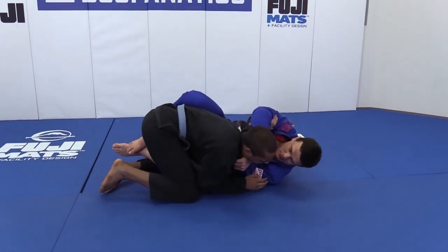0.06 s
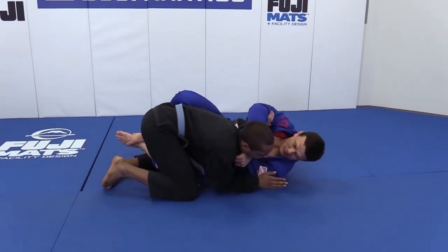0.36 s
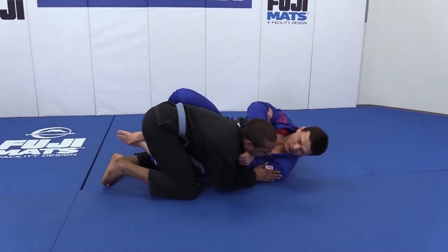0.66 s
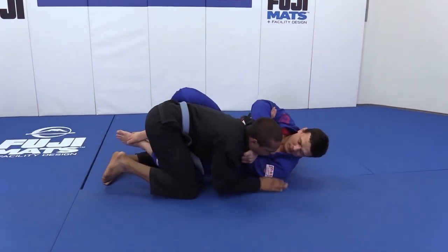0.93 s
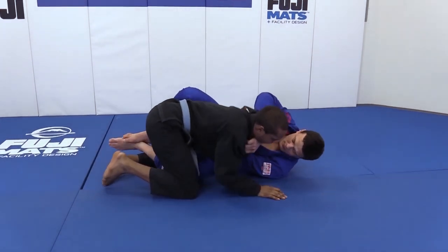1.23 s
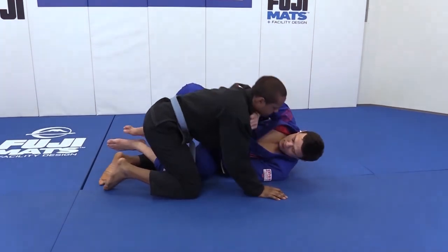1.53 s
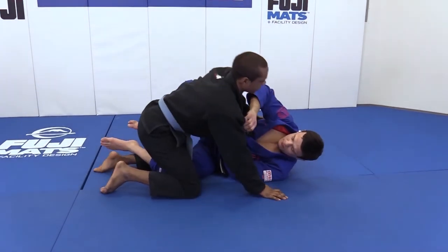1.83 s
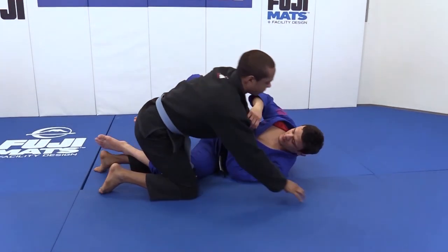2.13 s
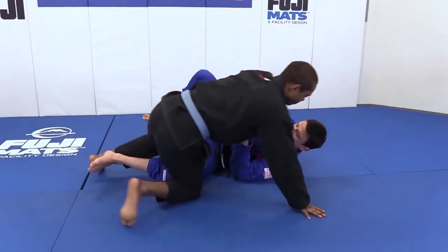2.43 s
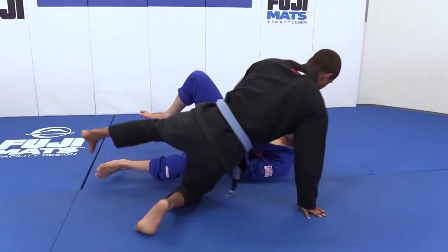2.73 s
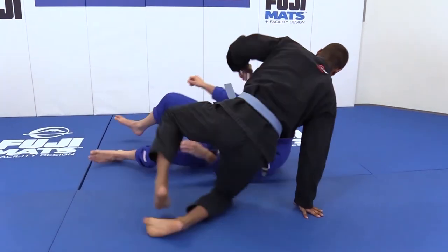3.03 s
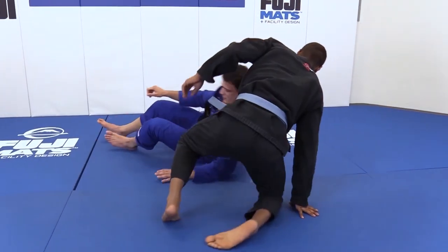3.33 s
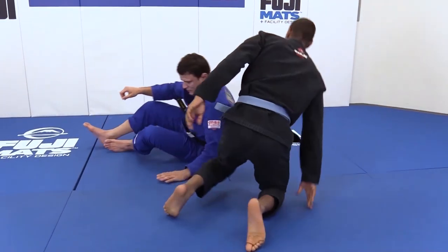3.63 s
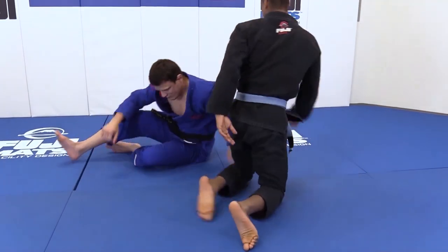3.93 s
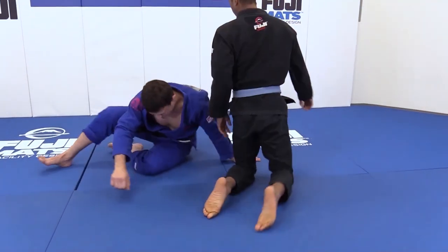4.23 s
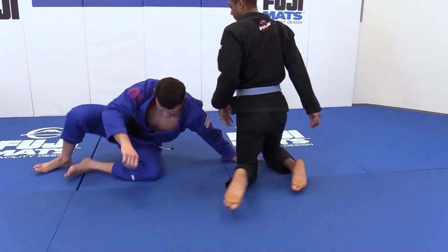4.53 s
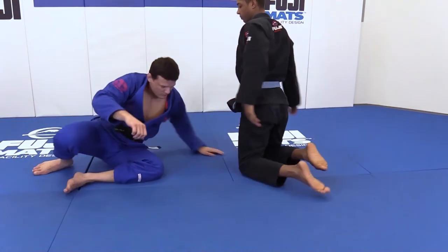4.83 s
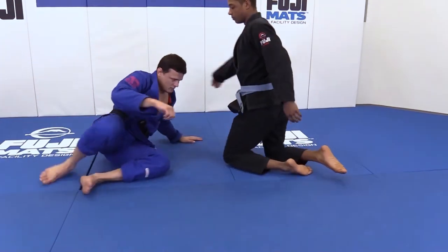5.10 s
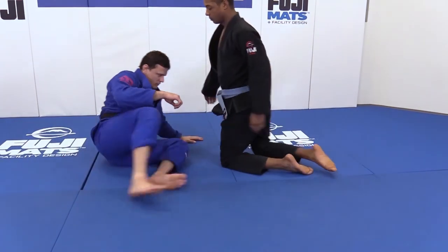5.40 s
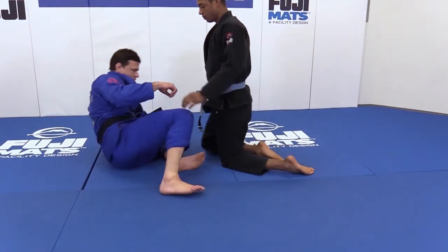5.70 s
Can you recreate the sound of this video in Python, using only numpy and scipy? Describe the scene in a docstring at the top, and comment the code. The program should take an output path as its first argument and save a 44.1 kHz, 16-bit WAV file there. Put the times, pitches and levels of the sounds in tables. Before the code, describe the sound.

Heavy cloth rustles and limbs drag, pat and thump on a padded mat as two people wrestle over faint room hiss.

```python
"""A low room hiss and a faint rustle come first; then two people in heavy cotton jackets are heard
grappling on a foam mat in a padded training room. Impact drives the slaps of hands and the thuds of
knees and hips, which set mat and floor ringing. Friction drives the swish of cloth on cloth and the
drags and scuffs over the mat's grained cover. One microphone hears it all, with a short reverberation."""
import sys
import numpy as np
from scipy import signal
from scipy.fft import rfft, irfft
from scipy.io import wavfile
from scipy.ndimage import uniform_filter1d

SR = 44100
rng = np.random.default_rng(int(sys.argv[2]) if len(sys.argv) > 2 else 0)


def wrap_up_sound(samples):
    """Save the sound to the file named by the first command line argument, as 16-bit audio."""
    columns = np.atleast_2d(samples).T
    # keep every value between -1 and 1, then stretch to whole-number steps
    tamed = np.clip(columns, -1, 1)
    steps = np.round(tamed * 32767).astype(np.int16)
    wavfile.write(sys.argv[1], SR, steps)


N = 262836
TIME = np.arange(N) / SR

# Spectra of the room's hiss, the jackets' swish and sheen, the rubbed cover and the loaded foam.
# Each row: frequency in Hz, relative level in dB.
HISS_SPECTRUM = [(15, -36), (25, -20), (60, -14.5), (100, -8.5), (160, -5), (250, -2.5), (460, -13.5),
                 (1000, -14.5), (2800, -16.5), (7000, -25), (9300, -32), (16000, -35.5)]
SWISH_SPECTRUM = [(300, -18.5), (1200, -19.5), (2200, -4), (3200, 1.5), (4500, 0.5), (7000, -5.5),
                  (8500, -13.5), (11000, -32), (16000, -45)]
SHEEN_SPECTRUM = [(3000, -31), (6500, -1), (8500, -1), (10500, -6.5), (13500, -10), (16000, -15)]
RUB_SPECTRUM = [(60, -42), (200, -30), (400, -6), (650, -1.5), (1000, 3), (1500, 1.5), (2100, 2),
                (3000, -3.5), (6000, -12), (16000, -58)]
RUMBLE_SPECTRUM = [(25, -83), (60, -19.5), (100, -14), (150, 1.5), (280, -0.5), (400, -7), (600, -8),
                   (1200, -17), (5000, -57)]
# The hiss dips briefly and later swells. Each row: time in seconds, level in dB.
HISS_LEVELS = [(0, -48.5), (.68, -47), (.82, -54), (1.05, -49.5), (1.5, -47.5), (2.3, -48), (2.7, -47.5),
               (3.0, -47), (5.96, -42)]
# Cloth on cloth. Each row: peak time, rise and fall in seconds, relative level in dB, sheen offset in dB.
CLOTH_STROKES = [ (0.0, .05, 0.15, -54.5, -9), (0.48, 0.22, 0.2, -55, -25), (0.637, .005, .012, -51, -8),
                 (1.075, 0.01, 0.045, -43.5, 0), (1.17, .002, 0.059, -51.5, -6),
                 (1.42, 0.15, .07, -51, -12), (1.745, 0.048, 0.089, -35.5, -6.5),
                 (1.82, 0.044, 0.062, -35.5, -4), (1.895, 0.072, 0.065, -35, -5.5),
                 (2.32, 0.18, 0.23, -59, 0), (2.535, .035, .09, -50.5, -1.5),
                 (2.89, 0.017, 0.046, -51, -1.5), (3.07, 0.08, 0.12, -39.5, -13),
                 (3.22, 0.086, .15, -26.5, -5), (3.5, .1, 0.1, -44, -3), (3.78, 0.13, .08, -47, -20),
                 (3.89, 0.038, 0.034, -53.5, 0.5), (4.03, 0.11, 0.093, -38.5, -14),
                 (4.085, .01, .05, -46, -3.5), (4.3, .09, .08, -36, -6.5), (4.46, 0.05, 0.062, -43.5, -2.5),
                 (4.6, 0.12, 0.13, -43.5, -9), (4.745, 0.061, 0.046, -39, -1),
                 (4.87, .06, 0.067, -45.5, -7), (5.029, 0.056, .055, -30.5, -5.5),
                 (5.226, 0.06, 0.068, -23.5, -0.5), (5.43, 0.078, 0.097, -27.5, -7),
                 (5.75, 0.21, 0.12, -38.5, -6.5), ]
# Limbs on the mat. Each row: peak time, rise and fall in seconds, relative rub and rumble levels in dB.
LIMB_DRAGS = [ (0.0, .05, 0.048, -50, -46), (1.32, 0.057, 0.15, -46, -52), (1.43, 0.036, 0.044, -48, -34.5),
              (2.08, 0.47, 0.13, -56.5, -50.5), (2.532, 0.037, .16, -49.5, -56),
              (2.95, 0.068, .08, -43, -42), (3.05, 0.042, 0.24, -30, -58), (3.19, 0.1, 0.14, -29.5, -36),
              (3.31, 0.048, 0.11, -30, -50), (3.61, 0.053, 0.12, -55, -39.5), (3.82, 0.15, .08, -47, -44.5),
              (4.03, .1, .09, -37, -38), (4.32, 0.13, 0.2, -42, -49), (4.6, 0.28, .08, -39, -44),
              (4.72, 0.069, 0.07, -35, -33.5), (4.87, .04, 0.15, -41.5, -62),
              (5.06, 0.11, 0.084, -34.5, -42.5), (5.43, 0.12, 0.45, -37, -49),
              (5.69, 0.16, 0.072, -43, -38.5), (5.86, 0.1, 0.054, -55, -36), ]
# The weave singing as it slides. Each row: start and length in seconds, first pitch, last pitch and
# bandwidth in Hz, level in dB.
WEAVE_SCUFFS = [ (0.279, 0.2, 445, 312, 170, -43.5), (1.68, 0.33, 900, 990, 604, -42),
                (1.751, 0.12, 577, 610, 200, -40.5), (1.784, 0.21, 2720, 2750, 1110, -39),
                (2.502, 0.097, 1030, 790, 350, -48), (2.991, .10, 786, 1130, 260, -34.5),
                (3.101, 0.21, 1240, 1360, 784, -30.5), (3.276, 0.067, 1060, 860, 170, -30),
                (3.353, 0.071, 845, 616, 200, -39), (3.475, 0.083, 330, 365, 160, -35.5),
                (3.622, 0.046, 1380, 1420, 120, -43.5), (3.74, 0.15, 2100, 2220, 300, -44),
                (3.747, 0.22, 3330, 3420, 450, -48), (3.927, 0.07, 920, 835, 250, -37.5),
                (3.95, 0.13, 1940, 1900, 700, -37.5), (4.196, 0.12, 345, 436, 185, -37.5),
                (4.43, 0.27, 405, 900, 350, -35.5), (4.528, .16, 990, 1380, 663, -31.5),
                (4.625, 0.13, 1120, 617, 720, -29), (4.807, 0.12, 1070, 1210, 360, -40.5),
                (5.154, 0.17, 2380, 3970, 1000, -34), (5.239, 0.034, 3660, 4080, 400, -23.5),
                (5.475, 0.32, 510, 710, 200, -41.5), ]
# Knees, hips and hands sinking into the mat. Each row: start in seconds, relative level in dB, pitch
# in Hz, decay in seconds, relative level of the air puff in dB, its centre in Hz.
LANDINGS = [ (0.389, -34.5, 303, 0.0045, -63, 700), (0.692, -18.5, 548, 0.0016, -30, 620),
            (0.701, -22, 233, 0.0028, -29.5, 690), (0.838, -21.5, 196, 0.0033, -46, 700),
            (1.093, -19.5, 170, 0.0033, -34, 860), (1.17, -22, 191, 0.0048, -41, 920),
            (2.344, -18, 127, 0.0038, -47, 900), (2.416, -15.5, 115, 0.0044, -42.5, 700),
            (2.47, -32, 92.8, 0.018, -58, 900), (2.857, -12.5, 302, 0.0019, -27.5, 865),
            (2.874, -12.5, 259, 0.003, -33.5, 452), (2.906, -31, 290.4, 0.016, -38, 700),
            (3.165, -14, 210, 0.0017, -47, 800), (3.179, -26, 287.5, 0.0087, -44, 800),
            (3.203, -23, 157, 0.0034, -49, 800), (3.449, -15.5, 229, 0.0035, -42, 497),
            (3.479, -17.5, 254, 0.0066, -37, 480), (3.503, -23, 206, 0.003, -41, 450),
            (3.618, -23.5, 324, 0.001, -31, 696), (3.712, -20.5, 176, 0.0026, -32, 790),
            (4.068, -16.5, 103, 0.003, -31, 800), (4.088, -15.5, 224, 0.0035, -47, 700),
            (4.162, -24.5, 290, 0.0051, -44, 600), (4.177, -18.5, 228, 0.0027, -37, 604),
            (4.657, -27.5, 157, 0.0034, -25.5, 670), (5.016, -32.5, 146, 0.0069, -37, 830),
            (5.699, -27, 224, 0.0039, -30.5, 693), (5.842, -29.5, 254, 0.0034, -50, 700),
            (5.878, -21.5, 239, 0.0014, -50, 700), (5.914, -19.5, 184, 0.0069, -49, 700), ]
# Bare skin striking the cover. Each row: start in seconds, relative level in dB, centre in Hz,
# width in octaves, decay in seconds.
SKIN_SLAPS = [ (0.685, -25, 1110, 0.93, 0.01), (0.692, -12, 1270, 1.1, 0.0035),
              (0.701, -37, 1600, 2.8, 0.012), (0.732, -36, 1490, 2.9, 0.018),
              (0.839, -16, 895, 0.66, 0.003), (2.343, -28.5, 1600, 2, 0.0016),
              (2.821, -32, 1030, 0.46, 0.0023), (3.619, -18.5, 3400, 2.2, 0.0015), ]
# Modes of mat and floor. Each row: frequency in Hz, bandwidth in Hz, gain in dB.
MAT_MODES = [(90.4, 18, -0.5), (143, 9.5, 4), (232, 20, -25), (275.2, 8.4, 5.5), (280, 30, -29),
             (361, 6.5, 5), (440, 49, -21), (494, 67, 3.5), (728, 77, -8.5), (856, 41, -16),
             (1080, 41, -29)]
# Early reflections from walls and ceiling. Each row: delay in seconds, gain as a ratio.
REFLECTIONS = [(.0065, 0.36), (0.0133, 0.29), (0.0221, .15), (.043, 0.04)]
# The room's reverberation. Each row: frequency in Hz, time to fall 60 dB in seconds.
REVERB_TIMES = [(100, 0.4), (260, 0.25), (700, 0.37), (1840, 0.26), (5000, 0.19), (14000, 0.086)]


def amp(db):
    """Amplitude grows tenfold for every 20 dB."""
    return 10 ** (np.asarray(db) / 20)


def unit(x):
    """Normalisation to an rms of 1."""
    return x / np.sqrt(np.mean(x ** 2) + 1e-20)


def read(points, hz):
    """Interpolation on a logarithmic frequency axis."""
    f, value = np.transpose(points)
    return np.interp(np.log(hz + 1), np.log(f + 1), value)


def add(mix, start, sound):
    """Superposition: a sound joins the mix at a start time in seconds."""
    part = mix[max(round(start * SR), 0):][:len(sound)]
    part += sound[:len(part)]


def resonate(x, hz, width):
    """A damped resonator passes a band at unit gain about a centre that may move."""
    turn = np.exp(2j * np.pi * np.cumsum(hz * np.ones(len(x))) / SR)
    pole = np.exp(-np.pi * abs(width) / SR)
    return 2 * (turn * signal.lfilter([1 - pole], [1, -pole], x / turn + 1e-18)).real


def room_air():
    """Ventilation gives broadband noise: a low murmur under a weaker hiss."""
    hz = np.fft.rfftfreq(N, 1 / SR)
    level = amp(np.interp(TIME, *np.transpose(HISS_LEVELS)))
    spectrum = rfft(rng.standard_normal(N)) * amp(read(HISS_SPECTRUM, hz))
    return level * unit(irfft(spectrum, N))


def strokes(rows, roundness=1.25):
    """Incoherent sources add in power: the envelope of strokes that each speed up and slow down."""
    power = np.zeros(N)
    for peak, rise, fall, db in rows:
        away = np.maximum((peak - TIME) / rise, (TIME - peak) / fall)
        near = away < 6
        power[near] += (amp(db) * np.exp(-away[near] ** roundness)) ** 2  # 1 is a cusp, 2 a bell
    return np.sqrt(power)


def friction(spectrum, snags_per_s, snag_share, spread_db, patchy_db, flutter_db):
    """Stick-slip friction: countless slips and a few snags, coloured by a changing contact patch."""
    sizes = amp(spread_db * np.minimum(rng.exponential(1, N), 4)) * rng.choice([-1, 1], N)
    snags = unit(sizes * (rng.random(N) < snags_per_s / SR))
    slips = np.sqrt(snag_share) * snags + np.sqrt(1 - snag_share) * rng.standard_normal(N)
    hz, _, bands = signal.stft(slips, SR, nperseg=512, noverlap=384)
    patches = uniform_filter1d(rng.standard_normal(bands.shape), size=7, axis=0)  # across frequency
    patches = unit(uniform_filter1d(patches, size=12, axis=1))  # across time
    flutter = unit(uniform_filter1d(rng.standard_normal(bands.shape[1]), size=5))
    bands *= amp(read(spectrum, hz)[:, None] + patchy_db * patches + flutter_db * flutter)
    return unit(signal.istft(bands, SR, nperseg=512, noverlap=384)[1][:N])


def jackets():
    """Sliding friction of cotton on cotton: each stroke is a swish with its own share of treble sheen."""
    swish = strokes([(*timing, db) for *timing, db, _ in CLOTH_STROKES])
    sheen = strokes([(*timing, db + sheen_db) for *timing, db, sheen_db in CLOTH_STROKES])
    weave = friction(SWISH_SPECTRUM, snags_per_s=1200, snag_share=0.18,
                     spread_db=1.5, patchy_db=1.3, flutter_db=0.76)
    fibres = friction(SHEEN_SPECTRUM, snags_per_s=1300, snag_share=0.069,
                      spread_db=1, patchy_db=1.5, flutter_db=0.3)
    return amp(-0.5) * swish * weave + amp(1) * sheen * fibres


def bodies(settle_db=-29, rise_s=0.037, fall_s=0.044):
    """Friction and deformation: limbs rub the cover; foam rumbles under load and settles after thuds."""
    sliding = strokes([(*timing, db) for *timing, db, _ in LIMB_DRAGS])
    leaning = [(*timing, db) for *timing, _, db in LIMB_DRAGS]
    settling = [(start + rise_s, rise_s, fall_s, db + settle_db) for start, db, *_ in LANDINGS]
    rub = friction(RUB_SPECTRUM, snags_per_s=900, snag_share=0.29,
                   spread_db=0.5, patchy_db=2, flutter_db=-0.45)
    rumble = friction(RUMBLE_SPECTRUM, snags_per_s=190, snag_share=0.33,
                      spread_db=-1.5, patchy_db=4.5, flutter_db=2.5)
    return amp(-1) * sliding * rub + strokes(leaning + settling) * rumble


def scuffs():
    """Quasi-periodic excitation: ribs of the weave cross the mat's grain in a fuzzy, gliding note."""
    out = np.zeros(N)
    for start, length, first_hz, last_hz, width, db in WEAVE_SCUFFS:
        count = round(length * SR)
        pitch = np.linspace(first_hz, last_hz, count)
        ribs = rng.standard_normal(SR)[:count]
        note = unit(resonate(resonate(ribs, pitch, width), pitch, width))
        add(out, start, amp(db) * note * np.sin(np.linspace(0, np.pi, count)))
    return out


def thud(db, hz, decay):
    """Damped oscillation: the foam gives and springs back, lower in pitch for a heavier limb."""
    t = TIME[:SR // 5]
    age = t / decay
    return -amp(db) * age * np.exp(1 - age) * np.sin(2 * np.pi * hz * t)


def slap(db, hz, octaves, decay):
    """Cavity resonance: a pocket of air squeezed under a limb tunes a burst; the cover adds a crack."""
    t = TIME[:SR // 5]
    edge_ratio = 2 ** (octaves / 2)
    pocket = signal.butter(2, [hz / edge_ratio, hz * edge_ratio], "bandpass", fs=SR, output="sos")
    cover = signal.butter(2, 2.03 * hz, "lowpass", fs=SR, output="sos")
    air = rng.standard_normal(len(t))
    burst = unit(signal.sosfilt(pocket, air)) + amp(-4.5) * unit(signal.sosfilt(cover, air))
    envelope = (1 - np.exp(-t / 0.0008)) * np.exp(-t / decay)
    return amp(db) * unit(burst * envelope) * np.sqrt(np.mean(envelope ** 2))


def blows():
    """Impact excitation: landing limbs ring the modes of mat and floor, and the room reflects them."""
    hits = np.zeros(N)
    for start, db, hz, decay, puff_db, puff_hz in LANDINGS:
        puff = slap(puff_db, puff_hz, octaves=0.7, decay=0.013)
        add(hits, start, thud(db, hz, decay) + puff)
    for start, db, hz, octaves, decay in SKIN_SLAPS:
        add(hits, start, slap(db, hz, octaves, decay))
    ringing = sum(amp(db) * resonate(hits, hz, width) for hz, width, db in MAT_MODES)
    # A small patch of mat radiates little deep bass.
    radiation = signal.butter(3, 58, "highpass", fs=SR, output="sos")
    direct = signal.sosfilt(radiation, amp(-1) * hits + ringing)
    early = direct.copy()
    for delay, gain in REFLECTIONS:
        add(early, delay, gain * direct)
    return amp(-1) * early + amp(-13.5) * reverb(direct)


def reverb(x, echoes_per_s=3000, onset_s=0.012):
    """Reverberation: random reflections decay exponentially, each band at its own rate."""
    count = SR // 2
    echoes = rng.choice([-1., 1.], count) * (rng.random(count) < echoes_per_s / SR)
    hz, t, bands = signal.stft(echoes * (TIME[:count] > onset_s), SR, nperseg=256)
    absorption = amp(-60 * t / read(REVERB_TIMES, hz)[:, None])
    tail = signal.istft(bands * absorption, SR, nperseg=256)[1]
    return signal.fftconvolve(x, tail / np.linalg.norm(tail))[:N]


def scene():
    """Sound pressures superpose at one microphone, which feeds both channels."""
    rustle = jackets() + bodies() + scuffs()
    mono = blows() + rustle + amp(-14.5) * reverb(rustle) + room_air()
    return np.array([mono, mono])


def record(dry):
    """Band limiting: a linear-phase low-pass filter removes the highest treble."""
    cutoff_hz = 15950
    low_pass = signal.firwin(511, cutoff_hz, window=("kaiser", 9), fs=SR)
    return signal.oaconvolve(dry, low_pass[None], "same", axes=1)


dry = scene()
out = record(dry)
wrap_up_sound(out)
```